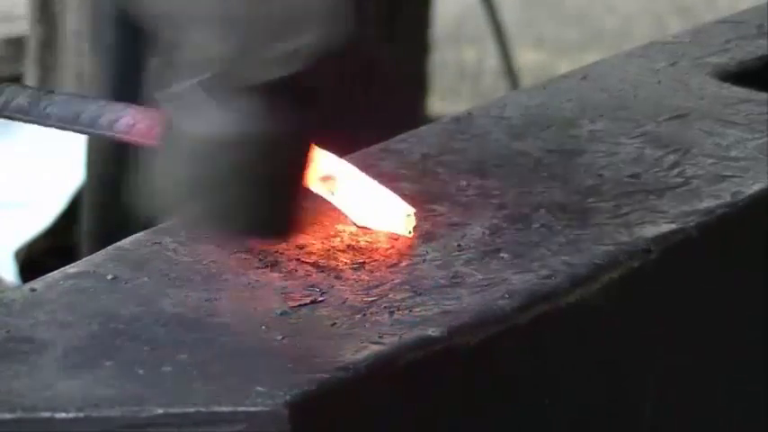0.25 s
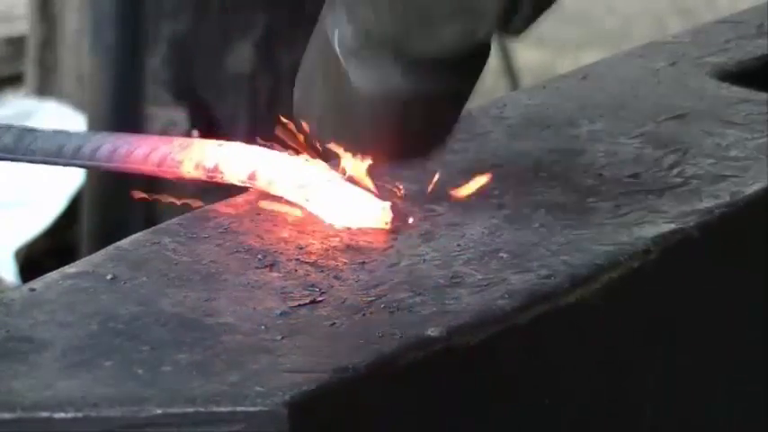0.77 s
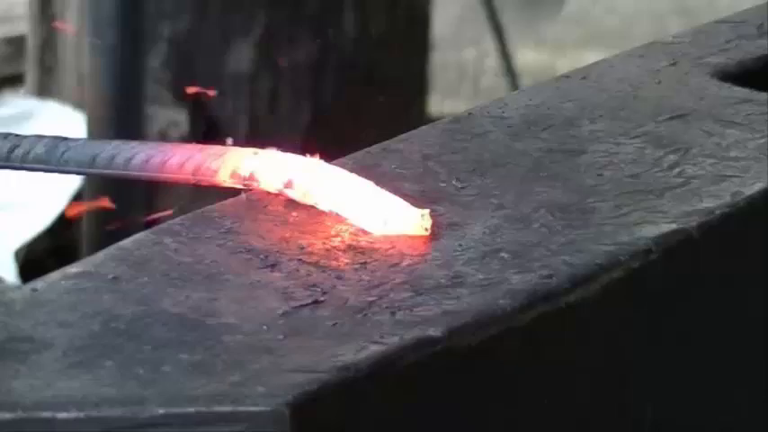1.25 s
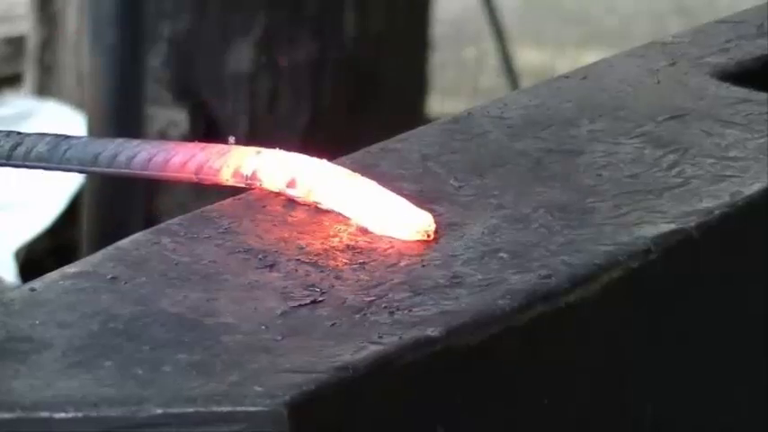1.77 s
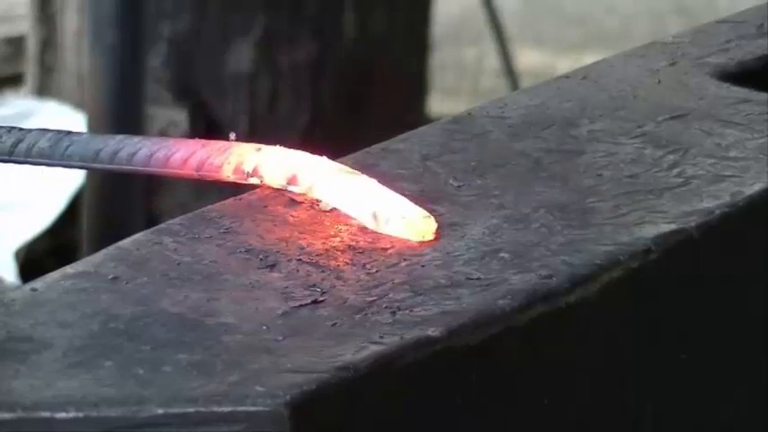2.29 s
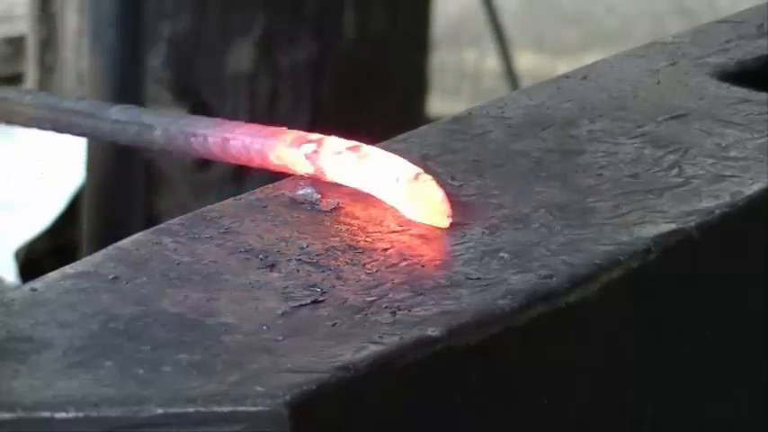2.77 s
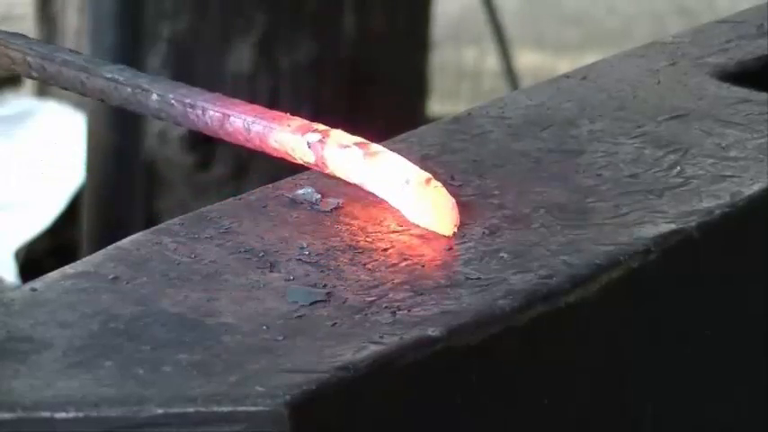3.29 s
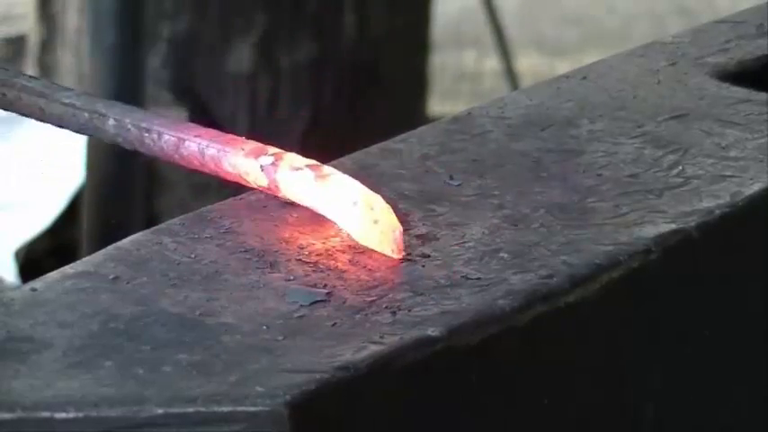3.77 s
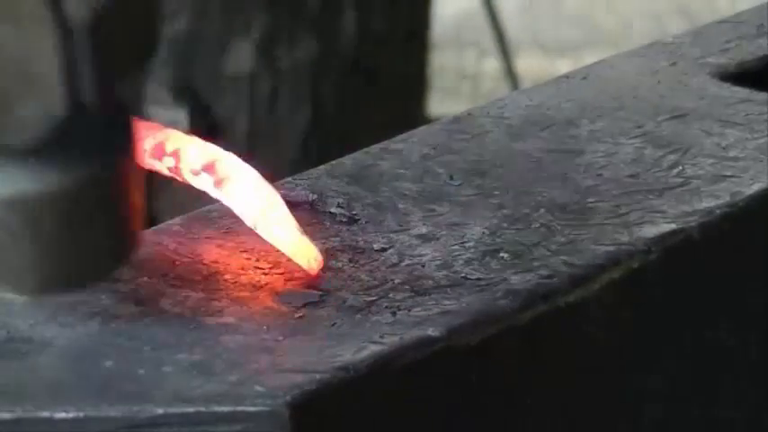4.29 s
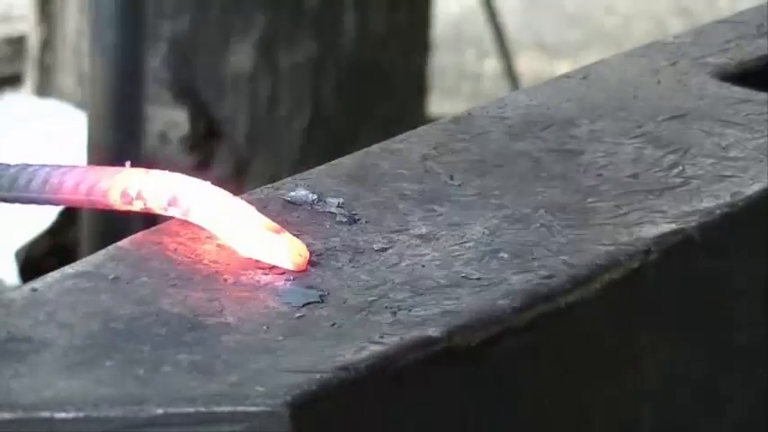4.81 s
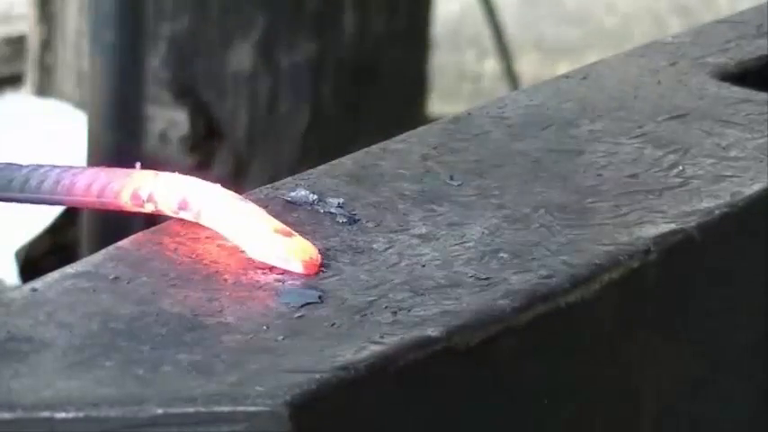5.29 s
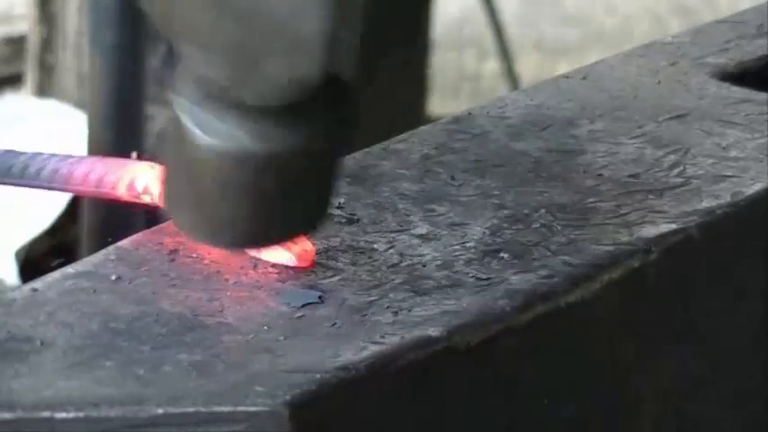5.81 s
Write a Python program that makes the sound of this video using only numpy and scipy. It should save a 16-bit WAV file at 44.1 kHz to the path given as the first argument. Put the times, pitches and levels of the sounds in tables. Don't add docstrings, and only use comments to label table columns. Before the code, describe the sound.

A gas forge gives a soft, steady, slightly flickering mid-range roar behind a close camera microphone. At 0.15 seconds a hammer drops on the bare anvil with a clear clank, a small rebound at 0.24. From 0.77 it strikes a hot steel bar every 0.45 seconds or so, at 1.2, 1.7, 2.1, 2.55 and 2.95, the last three hardest and brightest. Each blow is a hard overloaded crack, then a squashed, rough metallic ring and rattle lasting a few tenths of a second, with a hiss of scale. Lighter, duller hits come at 3.4, 3.8 and 4.1, with small ticks of flaking scale. At 4.3 the hammer rings on the bare face and bounces lower and faster, pattering to rest by 4.5. After a short gap, a strong bright blow lands at 5.07, then weaker ones at 5.4, 5.75 and 5.97, the last ringing into the end.

```python
import sys
import numpy as np
from scipy import signal
from scipy.fft import rfft, irfft
from scipy.io import wavfile
from scipy.ndimage import uniform_filter1d

SR = 44100
rng = np.random.default_rng(int(sys.argv[2]) if len(sys.argv) > 2 else 0)


def gain_from_db(level_db):
    decades = np.asarray(level_db, float) / 20
    return 10 ** decades


def to_wav(s):
    ch = np.atleast_2d(s).T
    pcm = np.round(np.clip(ch, -1, 1) * 32767)
    wavfile.write(sys.argv[1], SR, pcm.astype(np.int16))


N = 266805
T = np.arange(N) / SR

# start_s, force_db, anvil_body_db, hammer_head_db, anvil_heel_db
BLOWS = [(.766, 8.5, -20, -43, -16), (1.217, 11, -19, -32, -17.5), (1.664, 5, -17.5, -24, -14),
         (2.111, 13, -16, -19.5, -19), (2.551, 16, -20, -19.5, -11.5), (2.949, 14, -17.5, -12.5, -19),
         (3.434, 4, -20, -43, -46), (3.83, 3.5, -46, -44, -20), (4.124, 1.5, -18, -32, -30),
         (5.066, 15, -14.5, -16.5, -15), (5.413, 9, -18, -23, -21.5), (5.742, 8.5, -26, -28, -18),
         (5.967, 7, -22, -28, -22.5)]
BOUNCES = [
    (.156, 4.5, -15.5, -24, -21),
    (0.238, -3.5, -16, -34, -33),
    (4.301, 11, -15.5, -18.5, -21),
    (4.383, 2.5, -14, -23, -23.5),
    (4.431, -5, -9, -19, -32),
    (4.463, -10, -8, -35, -33),
    (4.486, -12.5, -12, -39, -37),
    (4.5, -23.5, -9, -40, -31),
]
# start_s, level_db, centre_hz, t60_s
FLAKES = [(.167, -23, 2500, .016), (0.246, -5.5, 1880, 0.016), (.516, -27, 7500, 0.022),
          (0.6477, -19.5, 2400, 0.035), (0.6525, -17.5, 8000, 0.057), (0.658, -31, 4620, 0.21),
          (.815, -14, 1510, 0.028), (1.0335, -30.5, 7050, 0.24), (1.074, -27, 12000, .027),
          (2.754, -36, 8000, 0.054), (3.408, -34, 10000, .047), (3.450, -5, 4850, 0.015),
          (3.461, -21, 6660, 0.04), (3.722, -43, 6000, .03), (4.439, -6, 2080, 0.0096)]
MODE_HZ = [940, 1040, 1396, 1690, 1886, 1912, 1950, 2490, 2680, 2748, 3055, 3162, 3785, 4270, 4932, 5350,
           5497, 5580, 5745, 5990, 6638, 7340, 8205, 8246, 8325, 8839, 9120, 10470, 10570]
# level_db, t60_s
MODES = [(-22, 0.056), (0.5, 0.057), (-1, 0.11), (-0.5, 0.096), (-2, 0.044), (0.5, 0.23), (-10.5, 0.1),
         (-15.5, 0.22), (2, 0.029), (-4, 0.17), (-6, 0.032), (-7.3, 0.13), (-19, 0.57), (2, 0.35),
         (0.5, 0.23), (-28, 0.19), (18.5, 0.068), (-8, 0.52), (-5, 0.16), (1, 0.15), (-3.2, 0.2),
         (-10.5, 0.19), (-4.5, 0.18), (3, 0.15), (-2, 0.071), (-27, 0.43), (-37, 0.51), (-14.5, 0.13),
         (-54, 0.17)]
RING_EDGES_HZ = [2300, 2900, 3500, 6200, 7500]
# centre_hz, rattle_db, t60_s, crack_db
CLATTER = [(220, -33.5, 0.16, -65), (410, -23, 0.26, -70), (656, -6, 0.082, -26.5), (900, -5.5, 0.19, -1),
           (1576, -3, 0.21, 1.5), (2400, -2, 0.18, -6), (3610, -7.5, 0.23, -2.5), (5900, -23.5, 0.23, -2.5),
           (8250, -18.5, 0.24, -6.5), (9500, -13, 0.13, -21)]
# pitch_hz, level_db_per_hz
FORGE = [(30, -60), (100, -102), (170, -17), (250, -17), (450, -9.5), (620, -3), (850, -6), (1100, -7.5),
         (1900, -8), (3000, -15), (6000, -21), (11000, -27.5)]
# pitch_hz, side_minus_mid_db
WIDTH = [(100, -10.5), (300, -12), (600, -18), (2000, -17), (4500, -10), (11000, -9)]
# time_s, level_db
FORGE_LEVEL = [(0, -35), (1.5, -36), (3, -36), (4.5, -36.5), (5.5, -36.5), (6.05, -39.5)]

WAIST_DB = (1.5, 3.5)
FACE_DB = (-17.5, 11)
BAR_RING_DB = (-32, -50)
RING_SHARE = (0.94, 0.76)
TILT_DB = (0.1, -0.5)
THUD_DB = (-28, -30)

LATE_S = .0009
HEAD_HZ = 6638
TILT_PER_DB = 0.139
CRACK_DB, CRACK_PER_DB, CRACK_TOP_DB = -13, 1.0, -0.5
THIN_PER_DB, THIN_FROM_DB = 0.76, 9.5
SPRAY_DB, SPRAY_PER_DB, SPRAY_T60_S = -36, 0.3781, .22
KNEE_DB, SQUASH_PER_DB = 0.56, 1.33
RECOVER_DB_S = 305
TOP_HZ = 10750


def strikes():
    rows = sorted([(*row, 0) for row in BLOWS] + [(*row, 1) for row in BOUNCES])
    s, force_db, body_db, head_db, heel_db, bare = np.transpose(rows)
    return s + LATE_S, force_db, body_db, head_db, heel_db, bare.astype(int)


def anvil():
    out, hz = np.zeros((2, N)), np.array(MODE_HZ)[:, None]
    mode_db, t60 = np.transpose(MODES)[:, :, None]
    head = (hz == HEAD_HZ) | (hz > 10000)
    group = np.searchsorted(RING_EDGES_HZ, np.where(head, HEAD_HZ, hz)[:, 0])
    lean = rng.standard_normal(hz.shape) * .4 * np.minimum(hz / 6000, 1)
    rough = np.where(head, .35, np.where(hz < 3500, 1.1, np.where(hz < 6200, 1.7, .7)))
    hold, holds = 400, 40
    for s, force_db, body_db, head_db, heel_db, bare in zip(*strikes()):
        i = int(s * SR)
        u = T[:min(holds * hold, N - i)]
        chance = np.repeat(rng.standard_normal((2, len(hz), holds)), hold, axis=2)
        size, wobble = uniform_filter1d(chance, hold, axis=2)[:, :, :len(u)]
        phase, spread = rng.standard_normal((2, len(hz), 1))
        groups_db = np.array([body_db, body_db + WAIST_DB[bare], body_db + FACE_DB[bare],
                              BAR_RING_DB[bare], head_db, heel_db])
        ring_db = force_db + groups_db[group][:, None] + mode_db + 2.8 * spread
        flutter_db = 3.54 * np.minimum(rough, 1) * size
        env = gain_from_db(ring_db + flutter_db - 60 * u / (t60 * RING_SHARE[bare]))
        turn = 2 * np.pi * hz * u + 3 * phase + 1.056 * rough * wobble
        left = (env * np.sin(turn + lean)).sum(axis=0)
        right = (env * np.sin(turn - lean)).sum(axis=0)
        out[:, i:i + len(u)] += [left, right]
    return out * gain_from_db(-4.0)


def clatter():
    s, force_db, *_, bare = strikes()
    tilt_db = np.array(TILT_DB)[bare] + TILT_PER_DB * force_db
    share = np.array(RING_SHARE)[bare]
    crack_db = np.minimum(CRACK_DB + CRACK_PER_DB * force_db, CRACK_TOP_DB)
    lumps, out = gain_from_db(2.2 * walk(150)), 0
    for hz, db, t60, snap_db in CLATTER:
        octaves = np.log2(hz / 2500)
        lean_db = tilt_db * octaves
        thin_db = THIN_PER_DB * (force_db - THIN_FROM_DB) * np.clip(octaves, -1.5, 0) * (1 - bare)
        tail_db = force_db + db + lean_db + 0.42 * thin_db - 19.5
        tail = fades(s, tail_db, t60 * share, 0.00063) * lumps * gain_from_db(2.3 * walk(60))
        crack = fades(s, crack_db + snap_db + lean_db + thin_db + 3, .009, .0005)
        out = out + stereo(band(hz, 0.42), hz) * (tail + crack)
    thud = fades(s, crack_db + np.array(THUD_DB)[bare], 0.21, .004)
    return out + stereo(band(71, 1.6), 60) * thud


def spray():
    s, force_db, _, head_db, _ = np.transpose(BLOWS)
    db = force_db + SPRAY_DB - SPRAY_PER_DB * np.maximum(head_db, -38)
    env = fades(s + LATE_S, db, SPRAY_T60_S, 0.0011)
    return stereo(band(6200, 0.63), 8400) * env * gain_from_db(1.5 * walk(150))


def flakes():
    out = 0
    for s, db, hz, t60 in FLAKES:
        out = out + stereo(band(hz, 1.0), hz) * fades(np.array([s]), [db], t60, 0.0004)
    return out


def forge():
    out, swell = 0, walk(1.5)
    for hz in 40 * 2 ** np.arange(0, 8.3, .4):
        db = curve(FORGE, hz) + 10 * np.log10(hz)
        out = out + stereo(band(hz, 0.43), hz) * gain_from_db(db + .5 * swell + 3.17 * walk(9))
    return out / out.std() * gain_from_db(np.interp(T, *np.transpose(FORGE_LEVEL)))


def walk(rate):
    k = int(SR / rate)
    held = np.repeat(rng.standard_normal(N // k + 1), k)
    return 0.88 * uniform_filter1d(uniform_filter1d(held, k), k)[:N]


def band(hz, octaves):
    f = np.fft.rfftfreq(N, 1 / SR) + 1
    shape = np.exp(-(np.log2(f / hz) / octaves) ** 2)
    x = irfft(rfft(rng.standard_normal((2, N))) * shape, N)
    return x / x.std()


def stereo(pair, hz):
    side = gain_from_db(curve(WIDTH, hz)) * pair[1]
    return np.array([pair[0] + side, pair[0] - side])


def fades(starts, db, t60, rise):
    env = np.zeros(N)
    for s, d, t in zip(starts, db, t60 + 0 * starts):
        i, t = int(s * SR), max(t, .002)
        u = T[:min(int(t * SR), N - i)]
        env[i:i + len(u)] += gain_from_db(d - 60 * u / t) * (1 - np.exp(-u / rise))
    return env


def curve(table, hz):
    table_hz, value = np.transpose(table)
    return np.interp(np.log(hz), np.log(table_hz), value)


def gain_control():
    db = np.zeros(N)
    for s, force_db in zip(*strikes()[:2]):
        u = T - s - .0013
        drop_db = np.clip(SQUASH_PER_DB * (force_db - KNEE_DB) - RECOVER_DB_S * u, 0, None)
        db = np.minimum(db, -drop_db * (u > 0))
    return gain_from_db(uniform_filter1d(db, size=31))


def starve(x, size, block, steady, wide, narrow, db, low_hz):
    f, _, z = signal.stft(x, SR, nperseg=size)
    power = (abs(z) ** 2).sum(axis=0)
    blocks = (np.arange(power.shape[1]) + block - 2) // block
    starts = np.flatnonzero(np.diff(blocks, prepend=blocks[0] - 1))
    loudest = np.maximum.reduceat(uniform_filter1d(power, wide, axis=0), starts, axis=1)
    masker = loudest[:, blocks - blocks[0]]
    centre = np.minimum(np.arange(len(f)) // narrow * narrow + narrow // 2, len(f) - 1)
    local = uniform_filter1d(power, narrow, axis=0)[centre]
    share = uniform_filter1d(local / (masker + 1e-18), steady, axis=1)
    keep = (share > gain_from_db(2 * db + 6 * f[:, None] / TOP_HZ)) | (f[:, None] < low_hz)
    total = power.sum(axis=0)
    attack = total > 5 * np.roll(total, 2)
    return signal.istft(z * np.where(keep | attack, 1, .03), SR, nperseg=size)[1][:, :N]


def scene():
    return anvil() + clatter() + spray() + flakes() + forge()


def top_cut(x):
    return signal.sosfilt(signal.butter(12, 11100, fs=SR, output="sos"), x)


def record(dry):
    x = .9 * np.tanh(dry * gain_control() / .9)
    x = signal.sosfilt(signal.butter(2, 190, "high", fs=SR, output="sos"), x)
    x = x + stereo(band(50, 1.5), 60) * gain_from_db(-80 + 18 * np.tanh(3 * walk(16)))
    x = starve(x, size=256, block=8, steady=1, wide=31, narrow=3, db=-27, low_hz=1200)
    x = starve(x, size=1024, block=1, steady=3, wide=71, narrow=7, db=-5.3, low_hz=4200)
    x = signal.sosfilt(signal.ellip(10, .2, 90, TOP_HZ, fs=SR, output="sos"), x)
    return top_cut(np.clip(x, -1, 1))


dry = scene()
out = record(dry)
to_wav(out)
```